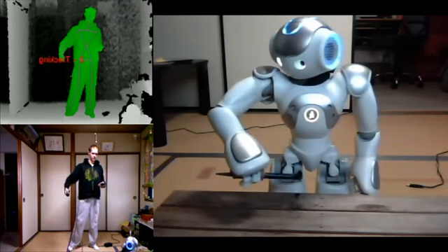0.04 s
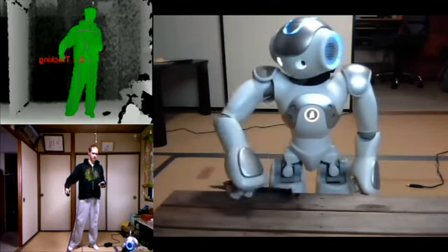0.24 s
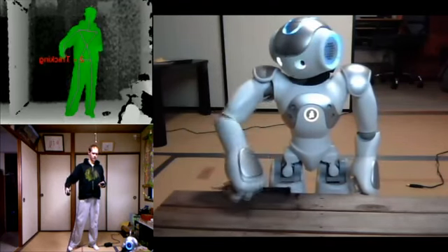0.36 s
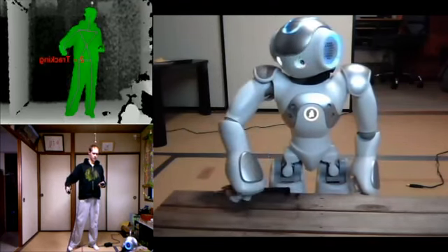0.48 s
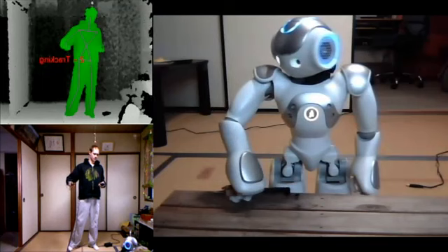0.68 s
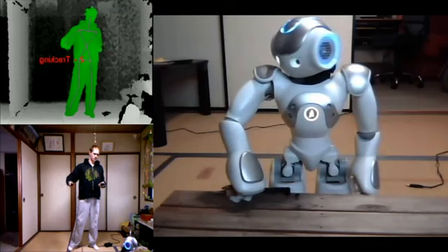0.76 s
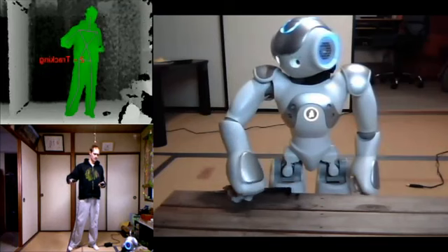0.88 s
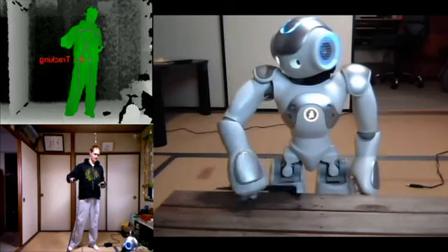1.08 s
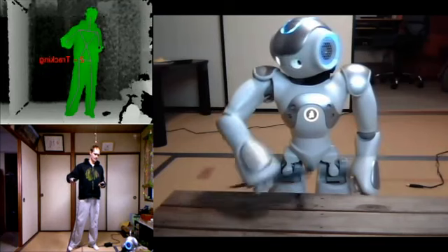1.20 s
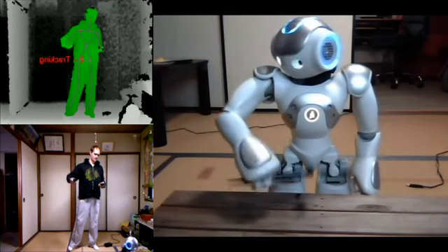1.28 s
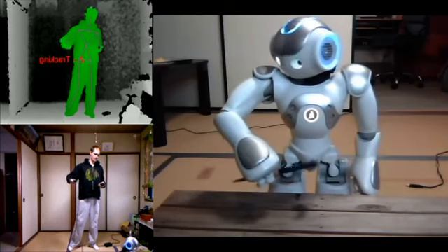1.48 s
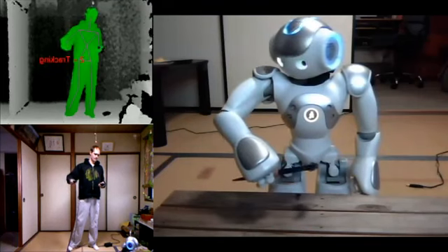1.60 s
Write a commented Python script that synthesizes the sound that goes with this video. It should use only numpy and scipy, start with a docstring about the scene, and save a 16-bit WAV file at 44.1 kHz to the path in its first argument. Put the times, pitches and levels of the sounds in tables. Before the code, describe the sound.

A hand tool knocks once, loud and sharp, on a wooden plank and clacks in a small robot's grip. Servos whirr, plastic joints click and a gear squeaks briefly. A fan hums in the small room.

```python
"""A hand tool, knocked on a wooden plank by a small robot, sets the plank's normal modes ringing and
overloads the microphone; the tool then clacks in the grip as it settles.
Geared servos whirr by tooth impacts, plastic joints click and tock, the feet thud, and a dry gear
squeaks as the arm lifts again. A cooling fan and a low throb fill the small, fairly live room."""
import sys
import numpy as np
from scipy import signal
from scipy.fft import rfft, irfft
from scipy.io import wavfile

SR = 44100
rng = np.random.default_rng(int(sys.argv[2]) if len(sys.argv) > 2 else 0)


def persist_wave(psi):
    """Save psi, clipped to +-1, as 16-bit WAV."""
    counts = np.round(np.clip(psi, -1, 1) * 32767).astype(np.int16)
    wavfile.write(sys.argv[1], SR, np.atleast_2d(counts).T)


N = 72765
T = np.arange(N) / SR


def from_db(db):
    """Amplitude ratio: tenfold for every 20 dB."""
    return 10 ** (np.asarray(db) / 20)


def unit_rms(x):
    """Normalisation to unit mean power."""
    return x / np.sqrt(np.mean(x ** 2) + 1e-20)


def at_hz(points, hz):
    """Interpolation on a logarithmic frequency axis."""
    frequencies, values = np.transpose(points)
    return np.interp(np.log(np.maximum(hz, 1)), np.log(frequencies), values)


def colour(x, spectrum):
    """Spectral shaping to rms 1, so only the spectrum's relative levels count."""
    hz = np.arange(N // 2 + 1) * SR / N
    low_cut = hz ** 2 / (hz ** 2 + (spectrum[0][0] / 2) ** 2)
    return unit_rms(irfft(rfft(x) * from_db(at_hz(spectrum, hz)) * low_cut, N))


def noise(spectrum):
    """Filtered Gaussian noise of rms 1."""
    return colour(rng.standard_normal(N), spectrum)


def tone(hz, jitter, rate_hz):
    """Random frequency modulation: low-passed noise bends the pitch of a sine of rms 1."""
    pole = np.exp(-2 * np.pi * rate_hz / SR)
    wander = signal.lfilter([1], [1, -2 * pole, pole * pole], rng.standard_normal(2 * N))[N:]
    pitch_hz = hz * (1 + jitter * unit_rms(wander))
    return np.sqrt(2) * np.sin(2 * np.pi * np.cumsum(pitch_hz) / SR)


def swell(peak_s, width_s):
    """Gaussian envelope."""
    return np.exp(-.5 * ((T - peak_s) / width_s) ** 2)


def strike(hits, modes, alternate=False):
    """Modal superposition: each hit excites damped sines, optionally of alternating sign."""
    signs = (-1) ** (np.arange(len(modes)) * alternate)
    ring = sum(sign * from_db(db - 60 * T / t60_s) * np.sin(2 * np.pi * hz * T)
               for sign, (hz, db, t60_s) in zip(signs, modes))
    out = np.zeros(N)
    for start_s, db in hits:
        start = int(start_s * SR)
        out[start:] += from_db(db) * ring[:N - start]
    return out


def bursts(hits, spectrum, t60_s):
    """Exponential decay: noise jumps up at each hit and falls 60 dB in t60_s."""
    envelope = sum((T >= start_s) * from_db(db - 60 * np.abs(T - start_s) / t60_s)
                   for start_s, db in hits)
    return noise(spectrum) * envelope


# Rush of the fan: frequency_hz, density_db
FAN_RUSH = [(30, 6.5), (55, 4), (85, 0), (120, 3), (160, -5.5), (260, -11), (430, -16.5), (540, -4),
            (650, -3.5), (800, -13), (1200, -16.5), (2200, -21.5), (4000, -22.5), (6800, -38)]
# Tones of the fan: pitch_hz, level_db
FAN_TONES = [(119, -50), (530, -56.5)]
def background():
    """Broadband and tonal fan noise, over a low throb."""
    hum = sum(from_db(db) * tone(hz, jitter=.0178, rate_hz=4) for hz, db in FAN_TONES)
    throb = from_db(-35.5) * tone(23.5, jitter=.028, rate_hz=6.7)
    return from_db(-39) * noise(FAN_RUSH) + hum + throb


# Reverberation time of the room: frequency_hz, t60_s
ROOM_DECAY = [(100, 0.84), (500, 0.22), (1500, 0.36), (4000, 0.17), (8000, 0.3)]
def room(x):
    """Reverberation: convolution with diffuse reflections that build up, then die band by band."""
    gap_s, build_s = .0018, .0054
    build_up = 1 - np.exp(-np.maximum(T - gap_s, 0) / build_s)
    white, tail = rng.standard_normal((2, N)), 0
    edges_hz = np.geomspace(125, 8000, 10)
    for k, (low, high) in enumerate(zip(edges_hz, edges_hz[1:])):
        band = signal.sosfilt(signal.butter(2, [low, high], "band", fs=SR, output="sos"), white[k % 2])
        band *= from_db(-60 * T / at_hz(ROOM_DECAY, np.sqrt(low * high))) * build_up
        tail += band * np.sqrt(2 * (high - low) / SR / np.sum(band ** 2))  # unit gain in the band
    return signal.fftconvolve(x, tail)[:N]


# Shifts of weight: start_s, level_db
FOOT_THUDS = [(.068, -49), (.397, -29.5), (.423, -50), (.47, -44), (.53, -48.5), (.95, -42.5), (1.628, -38)]
# Modes of the robot on its feet: pitch_hz, level_db, t60_s
FOOT_MODES = [(70, 8.5, 0.15), (103, 8, 0.34)]
def feet():
    """Damped oscillation: the robot's weight rocks on its feet with low thuds."""
    return strike(FOOT_THUDS, FOOT_MODES)


# Rasp of the gears: frequency_hz, density_db
GEAR_RASP = [(400, -9.5), (1200, -11), (1900, 3.5), (2250, 0.5), (2550, -2.5), (3000, -8), (3500, -13.5),
             (4200, -10), (5200, -11.5), (6800, -24)]
def rasp(level_db):
    """Broadband gear noise, the rough part of a buzz or squeak."""
    return from_db(level_db) * noise(GEAR_RASP)


# Loudness of the whirr with servo effort: time_s, level_db
SERVO_EFFORT = [(0, -42.5), (.06, -51), (.15, -44.5), (.2, -34.5), (.25, -27), (.55, -56), (.72, -54.5),
                (.79, -45), (.85, -50), (.89, -36.5), (.95, -51), (1.03, -43.5), (1.1, -35), (1.22, -45.5),
                (1.39, -47.5), (1.44, -46), (1.5, -48), (1.65, -49)]
# Response of the gear train: frequency_hz, gain_db
GEAR_RESPONSE = [(400, 9.5), (900, 6.5), (1600, 0), (2300, -0.5), (3400, -2), (4800, -6.5), (6800, -17)]
def servo_whirr():
    """Shot noise: dense random impacts of gear teeth merge into a whirr, louder with effort."""
    teeth_per_s, spread_db = 2500, 4.5
    teeth = (rng.random(N) < teeth_per_s / SR) * rng.choice([-1, 1], N)
    ticks = teeth * from_db(spread_db * rng.standard_normal(N))
    return colour(ticks, GEAR_RESPONSE) * from_db(np.interp(T, *np.transpose(SERVO_EFFORT)))


# Motor starts: peak_s, width_s, level_db
MOTOR_STARTS = [(0.016, 0.01, -42.5), (0.168, 0.014, -37), (1.423, 0.014, -43.5)]
# Swish of a motor: frequency_hz, density_db
MOTOR_SWISH = [(1500, -16), (2800, 0.5), (3700, -1.5), (5200, -7), (6800, -15.5)]
def motor_swish():
    """Amplitude-modulated noise: a motor swishes as it speeds up."""
    envelope = sum(from_db(db) * swell(peak_s, width_s) for peak_s, width_s, db in MOTOR_STARTS)
    return noise(MOTOR_SWISH) * envelope


# Partials of the braking gears: pitch_hz, level_db
BRAKE_PARTIALS = [(1080, -43), (1620, -45.5), (2230, -40), (2950, -45), (3920, -44)]
def brake_buzz():
    """Inharmonic vibration: the gears buzz briefly as the arm brakes."""
    partials = sum(from_db(db) * tone(hz, jitter=.06, rate_hz=394) for hz, db in BRAKE_PARTIALS)
    return swell(peak_s=1.556, width_s=.0098) * (partials + rasp(-40.5))


# Slips of a dry gear: peak_s, width_s, pitch_hz, level_db
GEAR_SLIPS = [(1.083, 0.0075, 2946, -29.5), (1.0908, 0.0029, 2527, -19), (1.106, 0.0071, 2365, -38),
              (1.119, 0.0082, 2493, -34.5)]
def gear_squeak():
    """Friction-excited vibration: a slipping gear gives short, rasping chirps."""
    return sum(from_db(db) * swell(peak_s, width_s) * (tone(hz, jitter=.05, rate_hz=500) + rasp(-5))
               for peak_s, width_s, hz, db in GEAR_SLIPS)


# Clicks of the shell: start_s, level_db
SHELL_CLICKS = [(.010, -43), (.138, -39), (.637, -39), (.9203, -19), (.9226, -16), (.933, -47),
                (.9752, -31.5), (1.119, -26.5), (1.486, -33)]
# Spectrum of the shell: frequency_hz, density_db
SHELL_SPECTRUM = [(330, -12), (510, 2.5), (800, 0), (1250, -4.5), (1700, -3.5), (2400, -2), (3000, -8),
                  (4200, -11), (6800, -26)]
def shell_clicks():
    """Heavy damping: each contact in the plastic shell dies away as a click."""
    return bursts(SHELL_CLICKS, SHELL_SPECTRUM, t60_s=.016)


# Impacts in the joints: start_s, level_db
JOINT_HITS = [(.049, -24), (.138, -24.5), (.180, -22), (.204, -21.5), (.214, -20), (.409, -21),
              (.437, -23.5), (.637, -32), (.887, -39), (.9205, -18), (.9752, -17), (1.144, -21.5),
              (1.174, -32), (1.631, -25.5)]
# Modes of the arm: pitch_hz, level_db, t60_s
ARM_MODES = [(531.8, -12.5, 0.21), (597, -3, 0.035), (630, -21.5, 0.013), (1020, -10, 0.04),
             (1065, -29, 0.04), (1674, -12.5, 0.045)]
def joint_tocks():
    """Backlash: play in the joints is taken up with dull tocks that ring the arm."""
    return strike(JOINT_HITS, ARM_MODES)


# Crack of a tool contact: frequency_hz, density_db
CONTACT_CRACK = [(150, 4), (500, 2), (900, -8), (1400, -2.5), (1900, -12), (2800, -6), (4200, -14.5),
                 (6800, -33.5)]
# Its diffuse wash in the room: frequency_hz, density_db
CONTACT_WASH = [(150, 0), (320, -8.5), (600, 1), (1000, 0), (1400, -2), (1900, -5.5), (2800, -6),
                (4200, -15), (5500, -19.5), (6800, -32)]
def contact_noise(hits, crack_db, crack_t60_s, wash_db):
    """Direct and diffuse sound: an impact's brief crack and its longer wash in the room."""
    crack = from_db(crack_db) * bursts(hits, CONTACT_CRACK, crack_t60_s)
    return crack + from_db(wash_db) * bursts(hits, CONTACT_WASH, t60_s=.37)


# Impacts of the tool in the grip: start_s, level_db
GRIP_HITS = [(.3178, -10), (.3203, 2), (.333, -20), (.355, -10.5), (.392, -14.5)]
# Modes of the tool: pitch_hz, level_db, t60_s
TOOL_MODES = [(991, -16.5, .17), (1026, -14.5, 0.072), (1133, -10.5, 0.064), (1210, -29, 0.35),
              (1440, -29, .03), (1680, -27, 0.05), (2310, -22, .12), (2820, -27, 0.078)]
def tool_clack():
    """Free vibration of the tool as it rattles in the grip; returns ring and noise."""
    crack = contact_noise(GRIP_HITS, crack_db=-13, crack_t60_s=.013, wash_db=-28.5)
    return strike(GRIP_HITS, TOOL_MODES), crack


# Impacts of the tool on the plank: start_s, level_db
PLANK_HITS = [(.2192, -16.5), (.2207, -6.5), (.2241, -7)]
# Modes of the plank: pitch_hz, level_db, t60_s
PLANK_MODES = [(50.7, -29, 0.99), (96.6, -8.5, 0.21), (249.4, -18.5, 0.34), (305, -19.5, 0.23),
               (358, -14.5, 0.14), (391.5, -11.5, 0.16), (515.5, -2.5, 0.25), (613.6, 5, 0.12),
               (674.5, -9.5, 0.36), (834, -11.5, 0.18), (922, -12, 0.11), (1400, -5.5, 0.087),
               (2079, -5.5, 0.1), (3220, -17, 0.11), (3245, -21, 0.079)]
# Bright snap of the hard tip: frequency_hz, density_db
TIP_SNAP = [(1200, -20), (2500, 5), (4500, -10), (6800, 4)]
# Boom of the floor and room: frequency_hz, density_db
FLOOR_BOOM = [(50, -9.5), (90, 8), (125, -13.5), (180, -21), (400, -45)]
def plank_knock():
    """Impulse excitation: the hard tip rings the plank and the floor booms; returns ring and noise."""
    snap = from_db(5.5) * bursts(PLANK_HITS, TIP_SNAP, t60_s=.011)
    crack = contact_noise(PLANK_HITS, crack_db=3, crack_t60_s=.071, wash_db=-7.5)
    boom = from_db(-19) * bursts(PLANK_HITS, FLOOR_BOOM, t60_s=.56)
    return strike(PLANK_HITS, PLANK_MODES, alternate=True), snap + crack + boom


def scene():
    """Linear superposition of the background, the direct sound and its reverberation."""
    works = shell_clicks() + gear_squeak() + servo_whirr() + motor_swish() + brake_buzz()
    arm = joint_tocks()
    plank, knock_noise = plank_knock()
    tool, clack_noise = tool_clack()
    direct = feet() + works + arm + tool + clack_noise + plank + knock_noise
    reverb = room(from_db(.5) * works + from_db(-8.5) * arm + from_db(-14.5) * tool + from_db(-10) * plank)
    return (background() + direct + reverb)[None]


def low_pass(x, hz, order, ripple_db=.3, stop_db=70):
    """Band limiting by a steep elliptic filter."""
    return signal.sosfilt(signal.ellip(order, ripple_db, stop_db, hz, fs=SR, output="sos"), x)


def record(dry):
    """Saturation: the knock overloads a narrow-band microphone with a faint mirror image of its treble."""
    mirror_hz, offset, hardness = 16000, .019, 8
    narrow = low_pass(dry, hz=6900, order=10)
    sidebands = narrow * np.cos(2 * np.pi * mirror_hz * T)
    mirror = low_pass(sidebands, hz=10200, order=8)
    drive = narrow + from_db(-12) * mirror + offset
    clipped = drive / (1 + np.abs(drive) ** hardness) ** (1 / hardness)
    return low_pass(clipped, hz=15800, order=12, ripple_db=.1, stop_db=90)


dry = scene()
out = record(dry)
persist_wave(out)
```